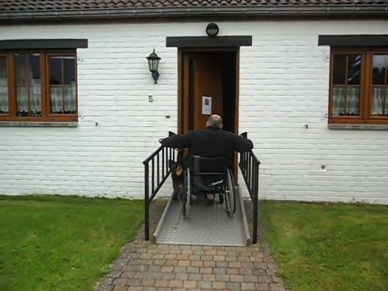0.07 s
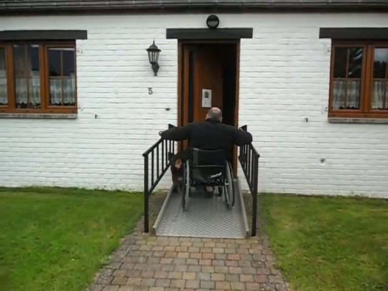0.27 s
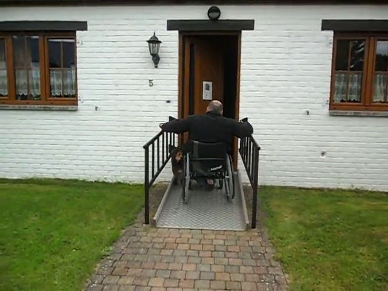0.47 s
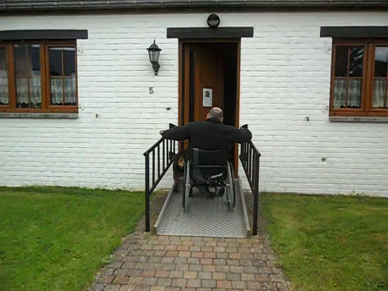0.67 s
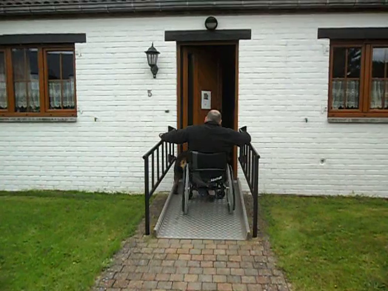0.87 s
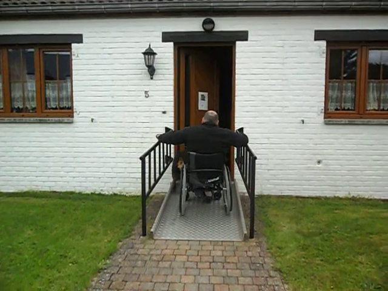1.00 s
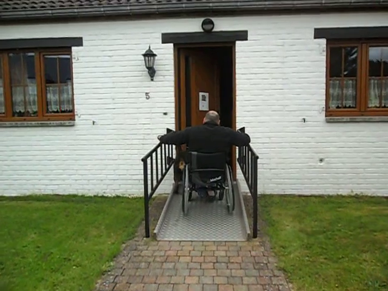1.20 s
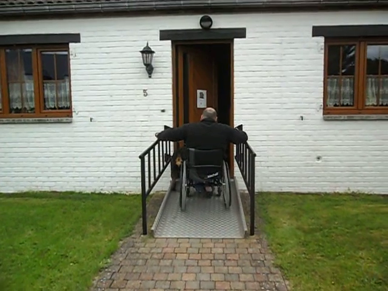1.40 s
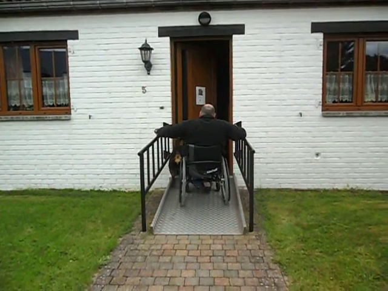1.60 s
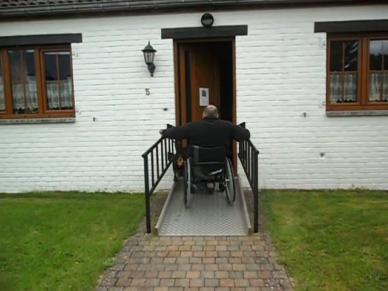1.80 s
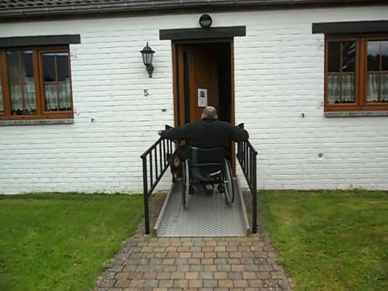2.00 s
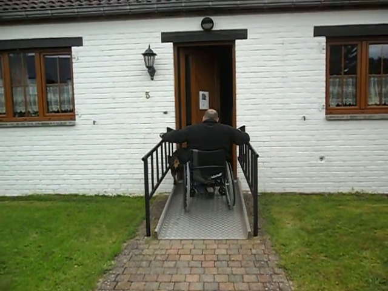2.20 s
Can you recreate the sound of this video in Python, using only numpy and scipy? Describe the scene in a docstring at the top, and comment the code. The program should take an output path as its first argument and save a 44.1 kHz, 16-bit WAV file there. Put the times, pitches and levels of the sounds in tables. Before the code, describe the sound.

Gusty wind buffets a bare camera microphone in low thumping bursts, with faint metallic wheelchair ticks

```python
"""Gusty wind buffets the bare microphone of a camera: a frozen row of eddies is read at the speed of the air,
so fast air sounds brighter; spurts and flutter also raise the level, and slow pressure swings rumble below.
Single strong eddies thump as short pulses. A few metres off, a wheelchair on a metal ramp gives faint ticks
(decaying rings with a noise crack) and short scuffs (grainy noise in two resonances). Steady hiss lies under all."""
import sys
import numpy as np
from scipy import signal
from scipy.fft import rfft, irfft
from scipy.io import wavfile
from scipy.ndimage import uniform_filter1d

SR = 44100
rng = np.random.default_rng(int(sys.argv[2]) if len(sys.argv) > 2 else 0)


def transcribe(signal):
    """Save signal, clipped to [-1, 1], as a 16-bit WAV file at the path in sys.argv[1]."""
    frames = np.atleast_2d(signal).T
    limited = np.clip(frames, -1, 1)
    pcm = np.round(limited * 32767).astype(np.int16)
    wavfile.write(sys.argv[1], SR, pcm)


N = 99577  # samples in the scene


def wind():
    """Turbulence carried past the microphone: air speed sets the pitch of the eddies, over slow pressure swings."""
    # Each row: time in seconds, buffeting level in dB, its treble relative to that level in dB, rumble level in dB.
    gusts = [(0.0, -40, -7, -46), (0.02, -30.5, -15.5, -31.5), (0.14, -52, -8.5, -40),
             (0.16, -28, -12, -20), (0.19, -34.5, -11, -33), (0.21, -20.5, -11, -21),
             (0.23, -14.5, -9, -37), (0.26, -25, -10, -31), (0.29, -20.5, -8.5, -17.5),
             (0.38, -24, -5.5, -24), (0.4, -21.5, -18, -32), (0.46, -36, -13.5, -33),
             (0.53, -25, -18.5, -34), (0.55, -21.5, -6, -38), (0.56, -20, -20, -42), (0.58, -28, -6, -32),
             (0.61, -20.5, -23, -31), (0.63, -28.5, -13, -30), (0.65, -14, -15, -36),
             (0.67, -17.5, -8, -35), (0.7, -8, -15, -14), (0.73, -16.5, -6, -25), (0.8, -10, -5, -13),
             (0.83, -19, -8.5, -28.5), (0.89, -17, -7, -12.5), (0.93, -16.5, -7.5, -16.5),
             (0.94, -19, -4.5, -34), (0.97, -12, -4, -12.5), (0.99, -21.5, -8, -37.5),
             (1.03, -19, -9.5, -15), (1.05, -16, -11, -22), (1.18, -17.5, -10.5, -27),
             (1.19, -14, -24, -25), (1.21, -24, -9, -22.5), (1.26, -38, -9, -31), (1.29, -24.5, -13, -22.5),
             (1.33, -25, -13, -30.5), (1.36, -17, -11.5, -29), (1.4, -32.5, -13, -41), (1.42, -33, -6, -26),
             (1.46, -25.5, -11.5, -33), (1.49, -25, -5.5, -20.5), (1.52, -30.5, -11.5, -28.5),
             (1.55, -29, -15, -31), (1.6, -40, -10, -28.5), (1.68, -28, -10, -32), (1.73, -24, -17, -20.5),
             (1.75, -27.5, -18, -32), (1.77, -27.5, -14, -20), (1.8, -26.5, -22, -22.5),
             (1.82, -28.5, -9, -23.5), (1.94, -42, -15, -31.5), (2.01, -37, -12.5, -32.5),
             (2.03, -24.5, -24, -27), (2.07, -27, -10.5, -24), (2.12, -31.5, -14.5, -34.5),
             (2.14, -21, -12.5, -33), (2.22, -35.5, -14.5, -32.5), (2.24, -23.5, -13, -24.5),
             (2.26, -24.5, -12.5, -21.5)]
    # Brief spurts and lulls of air. Each row: centre in seconds, gain of the air speed in dB.
    spurts = [(0.166, 2.5), (0.184, -4.5), (.235, 1.5), (.261, 3.5), (.283, 2.5), (.303, 3.5), (0.33, 3),
              (.340, 3), (0.37, 2.5), (0.378, 1.5), (0.546, 1), (.58, 1.14), (.603, 2.5), (.652, 2.5),
              (0.747, 1.5), (0.784, 1.43), (.825, 2.5), (0.856, 3), (.892, 3), (0.998, -7), (1.007, 3),
              (1.033, 4), (1.062, 4), (1.104, 3), (1.142, 2.5), (1.154, -4), (1.174, 2.5), (1.215, 3.5),
              (1.336, -3), (1.346, 2.5), (1.365, 2.5), (1.479, 1.5), (1.547, 2.5), (1.667, 3.5), (1.694, 2),
              (1.722, 2.5), (1.823, 2), (2.059, 3), (2.085, 2.5), (2.141, 1.8)]
    spurt_width_s, spurt_level_ratio = 0.0045, 1.16  # ratio: dB of level per dB of speed
    medium_treble_db, speed_db_per_treble_db = -10, 0.6564
    flutter_hz, flutter_level_db, flutter_speed_db = 60.8, 1.54, 0.2739
    lopsided = 0.05  # share of squared pressure, which makes the swings uneven

    t = np.arange(N) / SR
    gust_s, level_db, treble_db, rumble_db = np.transpose(gusts)
    low_pass = signal.butter(2, flutter_hz, fs=SR, output="sos")
    flutter = evened(signal.sosfilt(low_pass, rng.standard_normal(N)))
    spurt_db = sum(db * np.exp(-((t - at) / spurt_width_s) ** 2) for at, db in spurts)
    gust_speed_db = speed_db_per_treble_db * (np.interp(t, gust_s, treble_db) - medium_treble_db)
    speed = amp(spurt_db + gust_speed_db + flutter_speed_db * flutter)

    row = eddy_row(2 * N)
    passing = np.interp(np.cumsum(speed), np.arange(len(row)), row)
    passing = passing + lopsided * (passing ** 2 - 1)
    buffet_db = np.interp(t, gust_s, level_db) + flutter_level_db * flutter + spurt_level_ratio * spurt_db
    return passing * amp(buffet_db) + rumble() * amp(np.interp(t, gust_s, rumble_db))


def eddy_row(size):
    """A frozen row of turbulence: sparse eddies of random sign and strength mixed with smooth noise."""
    # Spectrum at medium air speed. Each row: frequency in Hz, relative density in dB per Hz.
    eddies = [(50, -49.5), (90, -1.5), (140, 0.56), (250, -4.5), (450, -10.5), (800, -24.5), (1300, -38.5),
              (2200, -54), (4000, -87), (7000, -130)]
    eddies_per_s, spread_db, smooth_share = 700, 2.5, 0.6  # rate at medium air speed
    draws = rng.random((size, 3))
    present = draws[:, 0] < eddies_per_s / SR
    sign = np.sign(draws[:, 1] - 0.5)
    strength = amp(-spread_db * np.log(draws[:, 2] + 0.046))
    sparse = evened(present * sign * strength)
    return colour(sparse + smooth_share * rng.standard_normal(size), eddies)


def rumble():
    """Slow pressure swings: noise held to the lowest frequencies, rms 1."""
    # Each row: frequency in Hz, relative density in dB per Hz.
    swings = [(8, -4), (22, 12.5), (45, 4.5), (75, 3), (110, -4), (200, -46.5), (500, -88), (1500, -150)]
    return colour(rng.standard_normal(N), swings)


def puffs():
    """Each strong eddy pushes the membrane in and sucks it back."""
    # Each row: time in seconds, level in dB, length in seconds.
    # The pulse fades in from one length before that time and is centred about half a length after it.
    strong_eddies = [(0.21, -20, 0.0061), (0.226, -10.5, 0.0047), (0.331, -8, 0.0039), (0.375, -8, 0.0056),
                     (0.545, -10.5, 0.0055), (0.648, -14, 0.0088), (0.704, -20, 0.0036),
                     (0.945, -15, 0.0053), (0.969, -5, 0.0045), (1.138, -5, 0.005), (1.344, -13.5, 0.0041),
                     (1.361, -6, 0.005), (1.545, -18.5, 0.0053), (1.715, -15.5, 0.0058),
                     (2.135, -16, 0.0054), (2.239, -13.5, 0.0045)]
    out = np.zeros(N)
    for s, db, length in strong_eddies:
        u = np.linspace(-4, 4, round(length * 3 * SR) + 8)
        push_and_suck = (1 - 0.9 * u - 1.06 * u ** 2) * np.exp(-u ** 2)
        add(out, s - length, amp(db) * push_and_suck)
    return out


def ticks():
    """Loose parts knock the frame: its modes ring and die, detuned a little each time, with a dry noise crack."""
    # Each row: start in seconds, level in dB, gain of the treble modes in dB.
    knocks = [(0.0643, -39, -9), (0.0944, -50, -13), (0.1238, -43, -4), (0.158, -38, -13),
              (0.2002, -35, -17), (0.2068, -28, -18), (0.2776, -39.5, -7), (0.318, -38.5, -8),
              (0.6716, -42, -4), (0.982, -28, -12), (1.0125, -36, -10), (1.0162, -36, -5),
              (1.0214, -25.5, -19.5), (1.1013, -36, -11), (1.2, -42.5, -7), (1.4315, -29, -19),
              (1.4414, -42, -8), (1.6034, -47.5, -2), (1.6107, -41.5, -12)]
    # Modes of the chair. Each row: nominal frequency in Hz, level in dB, time to fall by 60 dB in seconds.
    modes = [(2280, -12.5, 0.0058), (2746, -6, .022), (3196, -7.5, 0.022), (4140, -9, 0.0095),
             (5260, 1, 0.0077), (6050, -3.5, 0.0059), (7200, -9, 0.0041), (8460, -7.5, .016)]
    treble_from_hz, detune, attack_s = 4700, 0.13, 0.0012  # detune: full span as a share of the frequency
    crack_db, crack_t60_s, crack_hz, crack_width_hz = -15.5, 0.015, 4020, 6900
    out = np.zeros(N)
    t = np.arange(1500) / SR
    for (s, db, treble_db), draw in zip(knocks, rng.random((len(knocks), 16))):
        knock = np.zeros(len(t))
        for (hz, mode_db, t60), pitch, phase in zip(modes, draw[:8], draw[8:]):
            decay = amp(mode_db + treble_db * (hz > treble_from_hz) - 60 * t / t60)
            detuned_hz = hz * (1 + detune * (pitch - 0.5))
            knock += decay * np.sin(2 * np.pi * (detuned_hz * t + phase))
        crack = band(rng.standard_normal(len(t)), crack_hz, crack_width_hz)
        knock += amp(crack_db - 60 * t / crack_t60_s) * crack
        add(out, s, amp(db) * np.minimum(t / attack_s, 1) * knock)
    return out


def scuffs():
    """Tyre or cloth rubs: short grainy noise in two broad resonances."""
    # Each row: start in seconds, length in seconds, level in dB, low resonance relative to the top one in dB.
    rubs = [(0.057, 0.056, -68, 11.5), (0.649, 0.053, -68.5, 12.5), (0.915, 0.069, -56.5, -8),
            (1.395, 0.082, -57, 4.2), (.4, 0.034, -65, 3), (1.593, 0.043, -57, 0.5),
            (2.203, .06, -62.5, 1.5)]
    low_hz, low_width_hz, top_hz, top_width_hz = 2780, 2000, 5240, 2400
    grain_db, grain_samples = 1.82, 160  # depth and smoothing of the level wobble
    out = np.zeros(N)
    for s, length, db, low_db in rubs:
        top, low, grain = rng.standard_normal((3, round(length * SR)))
        rub = band(top, top_hz, top_width_hz) + amp(low_db) * band(low, low_hz, low_width_hz)
        wobble_db = grain_db * evened(uniform_filter1d(grain, size=grain_samples))
        swell = np.hanning(len(top)) ** 0.44
        add(out, s, amp(db + wobble_db) * swell * rub)
    return out


def hiss():
    """Microphone hiss and garden air: steady coloured noise."""
    # Each row: frequency in Hz, relative density in dB per Hz.
    hiss_spectrum = [(200, 8.5), (600, 4.5), (1000, 5), (1400, -2.5), (2400, -6.5), (3800, -9.5),
                     (6500, -12.5), (12000, -16)]
    return amp(-49.5) * colour(rng.standard_normal(N), hiss_spectrum)


def amp(db):
    """Turns decibels into a linear gain."""
    return 10 ** (np.asarray(db) / 20)


def evened(x):
    """Scales x to rms 1."""
    return x / np.sqrt(np.mean(x ** 2) + 1e-20)


def colour(x, points):
    """Filters x by a table of Hz and dB, joined along log frequency, to rms 1."""
    f, db = np.transpose(points)
    hz = np.fft.rfftfreq(len(x), 1 / SR)
    gain = amp(np.interp(np.log(hz + 1), np.log(f + 1), db))
    return evened(irfft(rfft(x) * gain, len(x)))


def band(x, hz, width):
    """One broad resonance, passed twice, rms 1."""
    peak = signal.iirpeak(hz, hz / width, SR)
    once = signal.lfilter(*peak, x)
    return evened(signal.lfilter(*peak, once))


def add(mix, s, sound):
    """Lays a sound into the mix from second s, cut at the end of the mix."""
    part = mix[max(round(s * SR), 0):][:len(sound)]
    part += sound[:len(part)]


def scene():
    """Wind at the microphone, the chair farther off, and the hiss."""
    return (wind() + puffs() + ticks() + scuffs() + hiss())[None]


def record(dry):
    """The input stage rounds off peaks, the top end rolls off, then a steep filter limits the band."""
    # Top end of the recorder. Each row: frequency in Hz, gain in dB.
    top_end = [(9800, -0.5), (10400, -2.5), (11000, -16.5), (11700, -18.5), (12300, -32.5)]
    soft_limit, edge_hz = 0.67, 12300  # limit in full-scale amplitude
    rounded = soft_limit * np.tanh(dry / soft_limit)
    padded = np.pad(rounded, [(0, 0), (1000, 1000)], "reflect")  # keeps the filters clean at the ends
    size = padded.shape[1]
    hz, db = np.transpose(top_end)
    gain = amp(np.interp(np.fft.rfftfreq(size, 1 / SR), hz, db))
    rolled = irfft(rfft(padded) * gain, size)
    low_pass = signal.firwin(511, edge_hz, window=("kaiser", 9), fs=SR)
    return signal.oaconvolve(rolled, low_pass[None], "same")[:, 1000:-1000]


dry = scene()
out = record(dry)
transcribe(out)
```